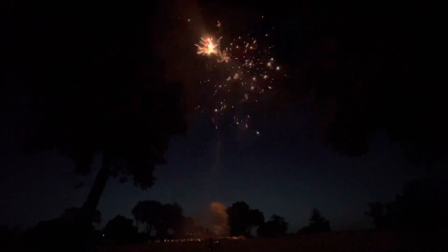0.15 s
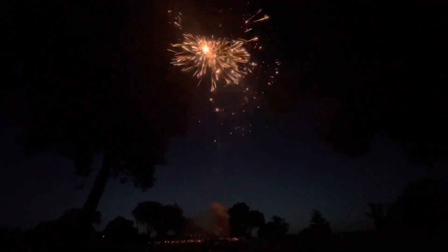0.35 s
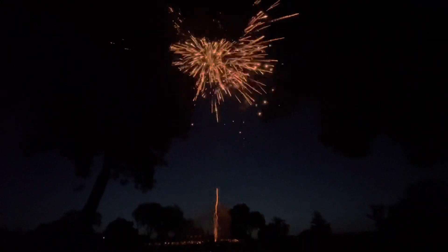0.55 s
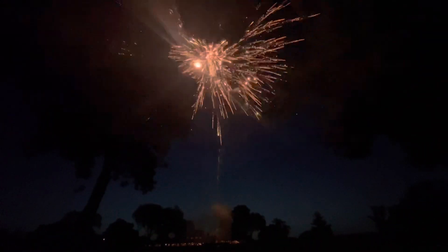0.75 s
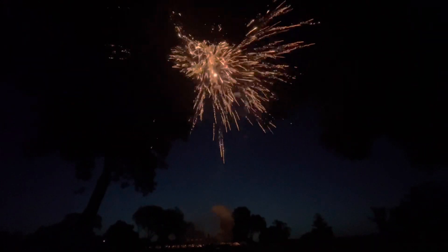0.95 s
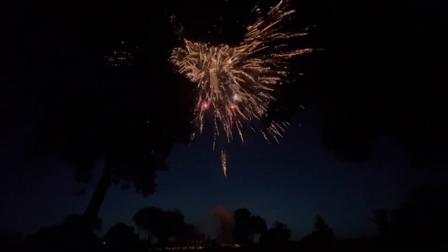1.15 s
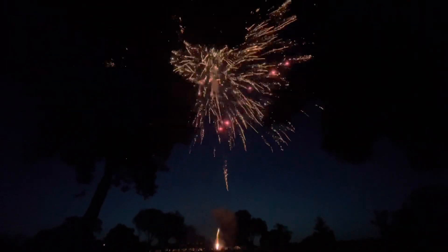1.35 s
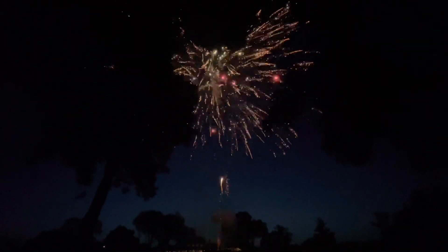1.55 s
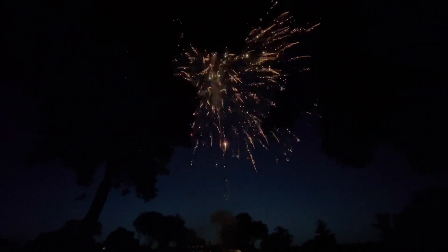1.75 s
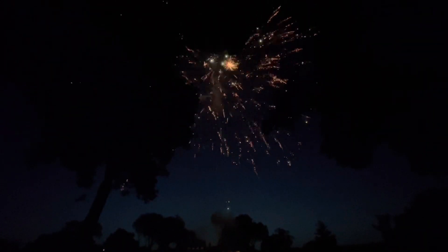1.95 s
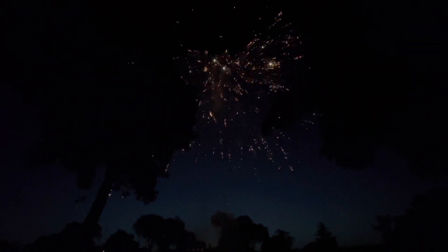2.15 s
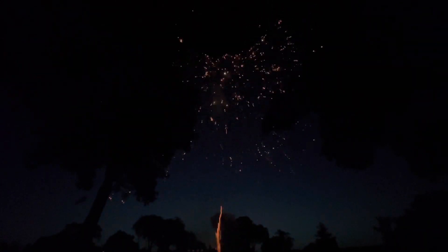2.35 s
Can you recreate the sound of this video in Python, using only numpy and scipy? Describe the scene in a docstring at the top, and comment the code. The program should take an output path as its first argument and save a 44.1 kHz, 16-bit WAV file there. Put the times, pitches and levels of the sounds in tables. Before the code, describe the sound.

Loud firework shells crackle and bang in two quick clusters outdoors, with a lone report later, echoing

```python
"""Firework shells burst over an open field at night, in two quick volleys and one late report.
Each burst is a pressure pulse with a ragged crack, doubled by its bounce off the ground, plus a rough bark.
Launch tubes thud softly around them; trees scatter the bangs, and echoes and rumble roll through the night air.
The recorder delays the lows, so every pop falls in pitch, and rounds the peaks."""
import sys
import numpy as np
from scipy import signal
from scipy.io import wavfile

SR = 44100
rng = np.random.default_rng(int(sys.argv[2]) if len(sys.argv) > 2 else 0)


def transcribe(u):
    """Save the signal u as a 16-bit wav file named by the first command-line argument.

    u: samples, shape (n,) or (channels, n), limited to [-1, 1]; the rate is SR.
    q: integer samples, one column per channel.
    """
    v = np.clip(np.atleast_2d(u).T, -1, 1)
    q = np.round(v * 32767).astype(np.int16)
    wavfile.write(sys.argv[1], SR, q)


N = 110250
T = np.arange(N) / SR
RIGHT_LAG_S, RIGHT_DB = 0.00006, 1.17   # pulses reach the right side later; pulses and cracks are louder there


def from_db(db):
    """Decibels to gain."""
    return 10 ** (np.asarray(db) / 20)


def at_hz(points, hz):
    """Read a table on a log-frequency axis."""
    table_hz, values = np.transpose(points)
    return np.interp(np.log(hz), np.log(table_hz), values)


def dying(t, t60_s):
    """Gain of a ring that loses 60 dB in the given time."""
    return np.exp(-np.log(1000) * t / t60_s)


def drift(rate_hz):
    """Smooth random stereo wander with an overall spread of 1: noise through two equal low-pass poles."""
    pole = np.exp(-2 * np.pi * rate_hz / SR)
    noise = rng.standard_normal((2, N + SR // 2))
    slow = signal.lfilter([1], [1, -2 * pole, pole * pole], noise)[:, -N:]   # drop the filter's start-up
    return slow / slow.std()


def noise_bands():
    """Half-octave bands of stereo noise of rms 1: (centre Hz, width Hz, noise)."""
    edges = 24 * 2 ** np.arange(0, 9.6, 0.5)
    white = rng.standard_normal((2, 2, N + SR // 4))   # neighbouring bands use separate noises
    bands = []
    for k, (low, high) in enumerate(zip(edges, edges[1:])):
        band_pass = signal.butter(2, [low, high], "band", fs=SR, output="sos")
        band = signal.sosfilt(band_pass, white[k % 2])[:, -N:]
        bands.append((np.sqrt(low * high), high - low, band / band.std()))
    return bands


def shares(spectrum, bands):
    """Share of the power that a spectrum puts in each band; the shares add up to 1."""
    power = np.array([width * from_db(at_hz(spectrum, hz)) ** 2 for hz, width, _ in bands])
    return power / power.sum()


def tail_power(feeds, rise_s, t60_s):
    """Every bang (s, dB) feeds a store of scattered sound power that builds up and dies away."""
    fed = np.zeros(N)
    for s, db in feeds:
        fed[int(s * SR)] += from_db(db) ** 2
    fall = np.exp(-2 * np.log(1000) / (t60_s * SR))
    rise = np.exp(-1 / (rise_s * SR))
    stored = signal.lfilter([1], [1, -fall], fed + 1e-18)   # tiny offset keeps the filter off zero
    return signal.lfilter([1 - rise], [1, -rise], stored)


def pulse(s, hz, damping_ratio):
    """A blast wave: a pressure jump of height 1 that swings into suction, reaching the left side first."""
    t = np.maximum(T - s - np.array([[0], [RIGHT_LAG_S]]), 0)
    live = t[0] < 0.08   # the swing has died out by then
    phase = 2 * np.pi * hz * t[:, live]
    q = np.sqrt(1 - damping_ratio ** 2)
    swing = np.cos(q * phase) - damping_ratio / q * np.sin(q * phase)
    out = np.zeros((2, N))
    out[:, live] = (phase > 0) * np.exp(-damping_ratio * phase) * swing
    return out


def bell(x, hz, q, db):
    """Raise or lower one band with a resonant equaliser."""
    w, a = 2 * np.pi * hz / SR, from_db(db / 2)
    h, c = np.sin(w) / (2 * q), -2 * np.cos(w)
    return signal.lfilter([1 + h * a, c, 1 - h * a], [1 + h / a, c, 1 - h / a], x + 1e-18)


# Night air's spectrum: (frequency [Hz], relative density [dB per Hz])
NIGHT_AIR_SPECTRUM = [(25, -13), (80, 8.5), (200, 2.5), (600, -30.5), (2000, -7), (5000, -22),
                      (9000, -42.5), (15000, -69)]
NIGHT_AIR_DB = -50.5


def night_air_power(bands):
    """The night air is steady noise: its power in each band."""
    return shares(NIGHT_AIR_SPECTRUM, bands) * from_db(NIGHT_AIR_DB) ** 2


# Rumble's spectrum as it is fed: (frequency [Hz], relative density [dB per Hz])
RUMBLE_SPECTRUM = [(35, -5.5), (80, -4), (200, 5.5), (600, -0.5), (1400, -8.5), (3000, -13), (6000, -8.5),
                   (9000, -14.5), (11500, -36.5), (15000, -60.5)]
# Rumble's decay: (frequency [Hz], time to lose 60 dB [s])
RUMBLE_DECAY = [(60, 2.5), (300, 5), (1000, 7.9), (3000, 3.54), (6000, 1.12), (11000, 1.2)]
RUMBLE_DB, RUMBLE_RISE_S = -42, 0.016
LINGERING_DB = -43.5   # rumble still in the air from earlier shells
SWELL_DB, SWELL_RATE_HZ, SWELL_BELOW_HZ = 1, 4.7, 1200   # the low rumble rolls unevenly


def rumble_power(bands):
    """A long rumble dulls as its highs die sooner: power by band and time."""
    feeds = [(s, RUMBLE_DB + db) for s, *_, db, _ in SHELL_BURSTS]
    feeds += [(s, RUMBLE_DB + db) for s, *_, db, _, _ in TUBE_LAUNCHES]
    out = []
    for (hz, _, _), share in zip(bands, shares(RUMBLE_SPECTRUM, bands)):
        t60_s = at_hz(RUMBLE_DECAY, hz)
        far = tail_power(feeds, RUMBLE_RISE_S, t60_s)
        if hz < SWELL_BELOW_HZ:
            far *= from_db(SWELL_DB * drift(SWELL_RATE_HZ)[0]) ** 2
        far += from_db(LINGERING_DB) ** 2 * dying(T, t60_s) ** 2
        out.append(share * far)
    return np.array(out)


# Far echoes rolling back from the trees:
# (peak time [s], rise [s], fall [s], level [dB], hump centre [Hz], hump height before levelling [dB])
FAR_ROLLS = [(0.022, 0.072, 0.042, -32, 626, 11.5), (.250, 0.029, 0.029, -34, 1110, 20.5),
             (0.655, 0.03, 0.11, -35.5, 340, 19), (.77, 0.11, 0.12, -30.5, 604, 9),
             (1.245, 0.041, 0.027, -38.5, 357, 11), (1.61, 0.064, .05, -46, 416, 8),
             (1.73, 0.09, 0.051, -47.5, 746, 14), (2.235, 0.0085, 0.016, -34, 430, 11.5),
             (2.272, 0.023, 0.042, -37, 680, 14.5), (2.325, 0.025, 0.052, -41, 820, -2)]
# Echoes' spectrum under the hump: (frequency [Hz], relative density [dB per Hz])
ROLL_SPECTRUM = [(35, -20), (100, -1), (300, 2.5), (700, -4.5), (1400, -6), (3000, -10.5), (7000, -19.5),
                 (9000, -21.5), (11500, -48), (15000, -59)]
ROLL_WIDTH_OCTAVES = 0.33


def roll_power(bands):
    """Far echoes swell and fade, each with a broad hump in its spectrum: power by band and time."""
    centres = np.array([hz for hz, _, _ in bands])
    base, out = shares(ROLL_SPECTRUM, bands), 0
    for s, rise_s, fall_s, db, hz, hump_db in FAR_ROLLS:
        hump = np.exp(-0.5 * (np.log2(centres / hz) / ROLL_WIDTH_OCTAVES) ** 2)
        colour = base * from_db(hump_db * hump) ** 2
        swell = np.exp(-((T - s) / np.where(T < s, rise_s, fall_s)) ** 2)
        out += np.outer(from_db(db) ** 2 * colour / colour.sum(), swell)
    return out


# Launches from the tubes, levels relative within each layer:
# (time [s], pulse [dB], pulse centre [Hz], crack [dB], click [dB],
#  scatter feed [dB], rumble feed [dB], thump [dB], thump pitch [Hz])
TUBE_LAUNCHES = [(0.030, -39, 90, -59, -57, -34, -28, -40, 66),
                 (0.136, -30.5, 240, -43, -41, -44, -24.5, -42, 80),
                 (1.4280, -22.5, 213, -44, -23, -21, -9, -31, 181),
                 (1.655, -33, 190, -61, -58, -45, -25.5, -37, 72),
                 (2.3315, -20.5, 193, -34.5, -16.5, -18, -21, -28, 86)]
LAUNCH_DAMPING_RATIO = 0.195
CLICK_HZ, CLICK_DAMPING_RATIO = 1800, 0.115   # the knock of a tube


def launch_pulses():
    """Launches are on the ground, so each soft pulse and its click arrive once, without a bounce."""
    out = 0
    for s, db, hz, _, click_db, *_ in TUBE_LAUNCHES:
        out += from_db(db) * pulse(s, hz, LAUNCH_DAMPING_RATIO)
        out += from_db(click_db) * pulse(s, CLICK_HZ, CLICK_DAMPING_RATIO)
    return out


# Crack's spectrum: (frequency [Hz], relative density [dB per Hz])
CRACK_SPECTRUM = [(100, 3), (500, 5.5), (1200, -3), (2900, -1), (5000, -9), (9000, -6), (12000, -16.5),
                  (15000, -38)]
CRACK_RISE_S, CRACK_FALL_S = 0.0013, 0.00067   # exponential time constants
CRACK_LIKENESS, BOUNCE_CRACK_DB = 0.16, -7   # correlation of the two sides; bounced crack against the direct one
ZING_HZ, ZING_Q, ZING_LIFT = 8930, 45, 2.37   # the cracks ring briefly in the microphone port


def crack_shape(s):
    """Envelope of the ragged front of a blast, a few milliseconds long."""
    return np.exp(np.minimum((T - s) / CRACK_RISE_S, (s - T) / CRACK_FALL_S))


def cracks():
    """The ragged front of each blast is a tick of wide noise; bursts crack again off the ground."""
    front = 0
    for s, _, _, crack_db, *_ in TUBE_LAUNCHES:
        front += from_db(crack_db) * crack_shape(s)
    for s, lag_ms, _, _, crack_db, *_ in SHELL_BURSTS:
        bounced = from_db(BOUNCE_CRACK_DB) * crack_shape(s + lag_ms / 1000)
        front += from_db(crack_db) * (crack_shape(s) + bounced)
    bands = noise_bands()
    mid, side = sum(np.sqrt(p) * band for p, (_, _, band) in zip(shares(CRACK_SPECTRUM, bands), bands))
    mid_part = np.sqrt((1 + CRACK_LIKENESS) / 2) * mid
    side_part = np.sqrt((1 - CRACK_LIKENESS) / 2) * side * [[1], [-1]]
    dry_cracks = front * (mid_part + side_part)
    return dry_cracks + ZING_LIFT * signal.lfilter(*signal.iirpeak(ZING_HZ, ZING_Q, fs=SR), dry_cracks)


THUMP_T60_S = 0.094


def thumps():
    """Each tube rings low and hollow for a few cycles after its launch: a dying sine."""
    out = 0
    for s, *_, db, hz in TUBE_LAUNCHES:
        t = np.maximum(T - s, 0)
        out += from_db(db) * np.sin(2 * np.pi * hz * t) * dying(t, THUMP_T60_S)
    return out


# Near scatter's spectrum: (frequency [Hz], relative density [dB per Hz])
SCATTER_SPECTRUM = [(40, -13.5), (120, -8.5), (200, -6), (450, 3), (900, -1.5), (2000, -8), (4500, -12.5),
                    (8500, -15), (11500, -21.5), (13000, -39), (15000, -62)]
SCATTER_DB, SCATTER_RISE_S, SCATTER_T60_S = -22.5, 0.0016, 0.34


def scatter_power(bands):
    """Near trees scatter every bang into a bright, short tail: power by band and time."""
    feeds = [(s, SCATTER_DB + db) for s, *_, db, _, _ in SHELL_BURSTS]
    feeds += [(s, SCATTER_DB + db) for s, *_, db, _, _, _ in TUBE_LAUNCHES]
    return np.outer(shares(SCATTER_SPECTRUM, bands), tail_power(feeds, SCATTER_RISE_S, SCATTER_T60_S))


# Stereo lean of the surroundings: (frequency [Hz], left minus right [dB])
SURROUNDINGS_BALANCE = [(100, -1.5), (400, 0.5), (1000, 2), (2500, 1.5), (5500, 10), (10000, 0)]
GRAIN_DB, GRAIN_RATE_HZ = 1, 180   # fast roughness shared by all bands of the tails
PATCHY_DB, PATCH_RATE_HZ = 2, 15   # slower unevenness, separate in each band


def surroundings():
    """Scatter, rumble, far rolls and night air all shape one set of noise bands by their summed power."""
    bands, out = noise_bands(), 0
    tails = rumble_power(bands) + roll_power(bands) + scatter_power(bands)
    grain = from_db(GRAIN_DB * drift(GRAIN_RATE_HZ))
    for (hz, _, band), tail, air in zip(bands, tails, night_air_power(bands)):
        power = tail * grain ** 2 + air
        lean_db = at_hz(SURROUNDINGS_BALANCE, hz) * np.array([[0.5], [-0.5]])
        out += band * np.sqrt(power) * from_db(lean_db + PATCHY_DB * drift(PATCH_RATE_HZ))
    return out


ECHOES_PER_SIDE, ECHO_FIRST_S, ECHO_LAST_S = 8, 0.011, 0.13
ECHO_DB, ECHO_T60_S, ECHO_LOW_HZ = -30, 0.61, 600   # level at zero lag, its fall with lag, low cut


def trunk_echoes(reports):
    """Single trunks throw back small, thin, delayed copies of the reports, different on each side."""
    thin = signal.sosfilt(signal.butter(2, ECHO_LOW_HZ, "high", fs=SR, output="sos"), reports)
    out = np.zeros((2, N))
    for lags in rng.uniform(ECHO_FIRST_S, ECHO_LAST_S, size=(ECHOES_PER_SIDE, 2)):
        for side, lag_s in enumerate(lags):
            k = int(lag_s * SR)
            out[side, k:] += from_db(ECHO_DB) * dying(lag_s, ECHO_T60_S) * thin[side, :-k]
    return out


# Aerial shell bursts, levels relative within each layer:
# (time [s], ground bounce lag [ms], pulse [dB], pulse centre [Hz], crack [dB], rasp [dB], rasp centre [Hz],
#  accent [Hz], accent gain [dB], hollow [Hz], hollow gain [dB],
#  scatter feed [dB], rumble feed [dB], boom [dB])
SHELL_BURSTS = [(0.2126, 7.07, 7, 633, -8.5, -5, 1285, 1080, 8.5, 1850, -17.5, -1.5, -18, -57),
                (0.3098, 7.2, 5.5, 323, -8, 0, 970, 1040, 2.5, 780, -5, -1, -3, -23),
                (0.3141, 7.33, 6.5, 338, -11, -23, 1000, 2520, -9, 2000, -9, 2, -5, -26),
                (0.3328, 7.6, 1.5, 301, -35, -17, 1090, 1090, 8, 800, -2, -19, -4.5, -47),
                (0.3417, 7.46, 5.5, 370, -18, -16, 1080, 1690, 4.5, 780, -10, -8, -7, -47),
                (0.3578, 7.47, 2.5, 306, -17, -12, 1070, 1070, 4, 800, -5, -2.5, -16, -41.5),
                (0.3752, 7.29, 3.5, 290, -12.5, -8, 1070, 1040, 3.5, 790, -12, -3.5, -5.5, -47),
                (0.4403, 7.42, 2.5, 315, -16, -14, 1065, 1050, 7, 790, -8, -2.5, -5.5, -45),
                (0.5044, 7.3, 5, 295, -12.5, -8, 1060, 1010, 5.5, 810, -12.5, -1, -9, -22),
                (0.5264, 6.9, 0.5, 500, -17.5, -18, 1250, 1740, 7, 2170, -7, -15.5, -13, -46),
                (0.8532, 7.4, -4.5, 394, -23, -11, 1110, 397, 5.5, 1260, 1, -10, -9, -45),
                (0.8597, 7.52, 4.5, 192, -6, -15.5, 960, 417, 6, 705, -15, 2, 0, -6.5),
                (0.9299, 6.88, 8.5, 270, -11, -7, 2230, 2450, -9.5, 850, -14, -2, 2, -15),
                (1.002, 7.43, 5, 237, -10, -17, 2280, 2240, 6.5, 1800, 0, -2.5, -1.5, -11),
                (1.0453, 7.87, 5.5, 310, -19, -10, 1490, 1500, 4.5, 820, -3, -1, -3, -43),
                (1.1182, 6.83, 4.5, 560, -17, -10, 1044, 1060, 2.5, 2100, -2, -3.5, -7, -50),
                (2.1032, 7.15, 3.5, 212, -6.5, -10.5, 1530, 580, 8.5, 270, -3.5, 2, -12.5, -6)]
BURST_DAMPING_RATIO, BOUNCE_SHARE = 0.5, 0.89   # bounce as a share of the direct pulse
ACCENT_Q, HOLLOW_Q = 4.3, 5.4   # sharpness of each shell's own colour


def burst_pulses():
    """Each burst arrives directly and again off the ground, coloured by two bells of its own."""
    out = 0
    for s, lag_ms, db, hz, _, _, _, accent_hz, accent_db, hollow_hz, hollow_db, *_ in SHELL_BURSTS:
        direct = pulse(s, hz, BURST_DAMPING_RATIO)
        bounce = BOUNCE_SHARE * pulse(s + lag_ms / 1000, hz, BURST_DAMPING_RATIO)
        accented = bell(from_db(db) * (direct + bounce), accent_hz, ACCENT_Q, accent_db)
        out += bell(accented, hollow_hz, HOLLOW_Q, hollow_db)
    return out


RASP_RISE_S, RASP_FALL_S, RASP_WIDTH = 0.0052, 0.0046, 1.14   # width: band edges as a ratio to the centre


def rasps():
    """Each casing tears with a short rough bark: a puff of noise in a narrow band of its own."""
    out = 0
    for s, _, _, _, _, db, hz, *_ in SHELL_BURSTS:
        band_pass = signal.butter(2, [hz / RASP_WIDTH, hz * RASP_WIDTH], "band", fs=SR, output="sos")
        band = signal.sosfilt(band_pass, rng.standard_normal(N))
        t = np.maximum(T - s, 0)
        puff = (1 - np.exp(-t / RASP_RISE_S)) * np.exp(-t / RASP_FALL_S)
        out += from_db(db) * band / band.std() * puff
    return out


BOOM_START_HZ, BOOM_SAG_S = 73.3, 0.28   # the pitch has halved after the sag time
BOOM_T60_S, BOOM_RIGHT_DB = 0.15, -18.5
BOOM_LINGER_DB, BOOM_LINGER_T60_S = -19, 0.46   # the boom's slower, fainter end


def boom():
    """The heaviest blasts set the microphone booming: a low, sagging ring, mostly on the left."""
    out = 0
    for s, *_, db in SHELL_BURSTS:
        t = np.maximum(T - s, 0)
        cycles = BOOM_START_HZ * BOOM_SAG_S * np.log1p(t / BOOM_SAG_S)
        fade = dying(t, BOOM_T60_S) + from_db(BOOM_LINGER_DB) * dying(t, BOOM_LINGER_T60_S)
        out += from_db(db) * np.sin(2 * np.pi * cycles) * fade
    return out * from_db([[0], [BOOM_RIGHT_DB]])


AIR_CUT_HZ = 1760


def through_air(pulses):
    """The air softens the edge of every pulse: a gentle one-pole treble cut."""
    return signal.sosfilt(signal.butter(1, AIR_CUT_HZ, fs=SR, output="sos"), pulses)


def scene():
    """The blasts and what the field makes of them."""
    pulses = through_air(launch_pulses() + burst_pulses())
    reports = (pulses + cracks()) * from_db([[0], [RIGHT_DB]]) + rasps()
    return reports + trunk_echoes(reports) + boom() + thumps() + surroundings()


DELAY_LOW_HZ, DELAY_HIGH_HZ = 48.4, 1150   # span of the phase lag before each side's ratio
LEFT_DELAY_RATIO, RIGHT_DELAY_RATIO = 0.96, 0.9
BASS_HZ, BASS_Q, BASS_LIFT = 102.7, 1.76, 0.7   # the microphone's bass bump; lift as added gain
PEAK_CEILING, TREBLE_CUT_HZ, TOP_STOP_HZ = 0.65, 12500, 16700


def lag_lows(x, ratio):
    """A chain of all-pass stages: the lower the tone, the later it comes out."""
    for hz in ratio * np.geomspace(DELAY_LOW_HZ, DELAY_HIGH_HZ, num=8):
        k = np.tan(np.pi * hz / SR)
        c = (k - 1) / (k + 1)
        x = signal.lfilter([c, 1], [1, c], x)
    return x


def record(dry):
    """The bass is lifted and held back, peaks are rounded off, the top is cut."""
    left, right = dry + BASS_LIFT * signal.lfilter(*signal.iirpeak(BASS_HZ, BASS_Q, fs=SR), dry)
    wet = np.array([lag_lows(left, LEFT_DELAY_RATIO), lag_lows(right, RIGHT_DELAY_RATIO)])
    rounded = wet / (1 + (wet / PEAK_CEILING) ** 6) ** (1 / 6)
    softened = signal.sosfilt(signal.butter(4, TREBLE_CUT_HZ, fs=SR, output="sos"), rounded)
    return signal.sosfilt(signal.cheby2(12, 70, TOP_STOP_HZ, fs=SR, output="sos"), softened)


dry = scene()
out = record(dry)
transcribe(out)
```